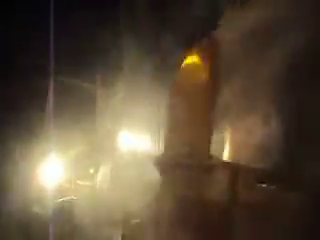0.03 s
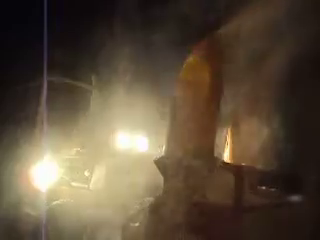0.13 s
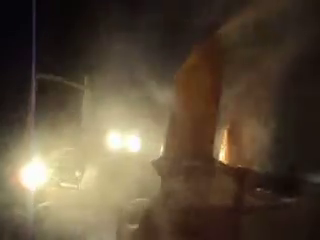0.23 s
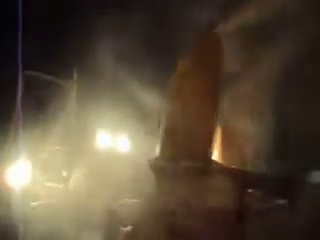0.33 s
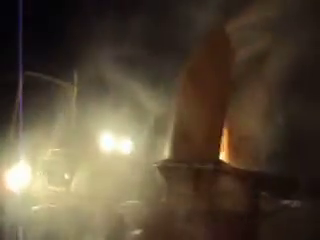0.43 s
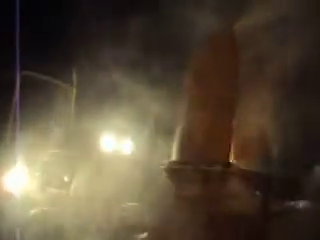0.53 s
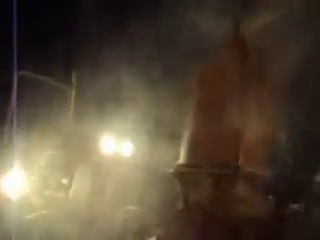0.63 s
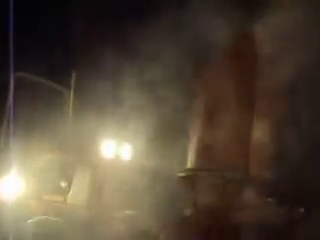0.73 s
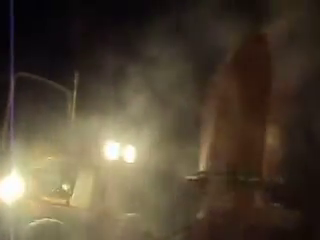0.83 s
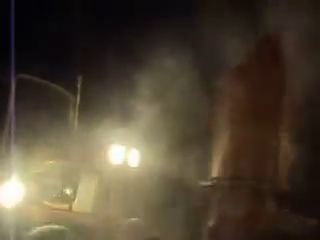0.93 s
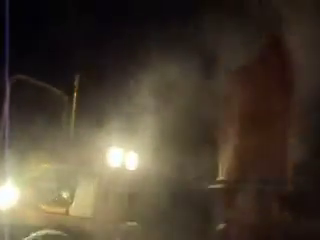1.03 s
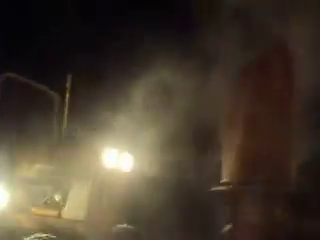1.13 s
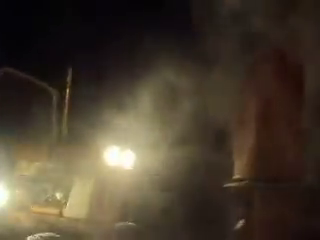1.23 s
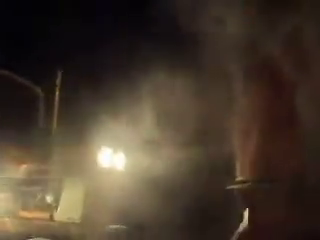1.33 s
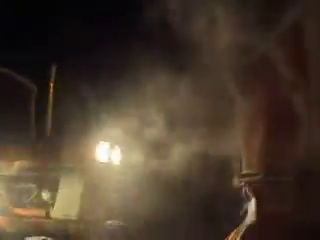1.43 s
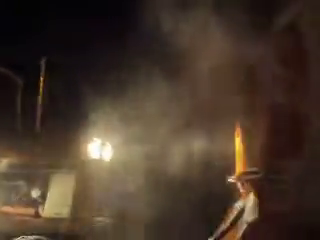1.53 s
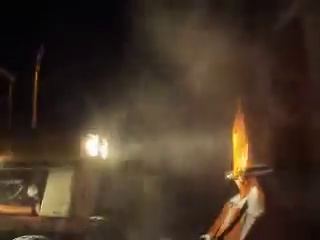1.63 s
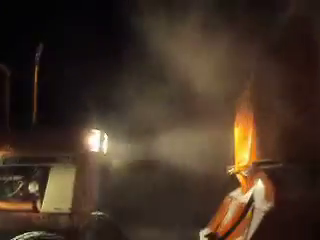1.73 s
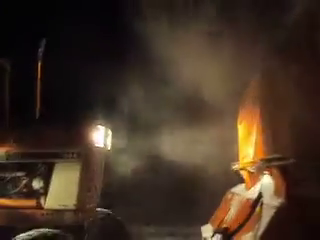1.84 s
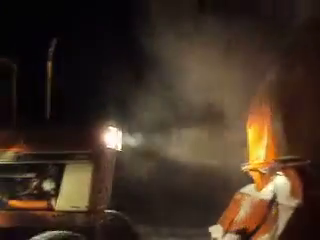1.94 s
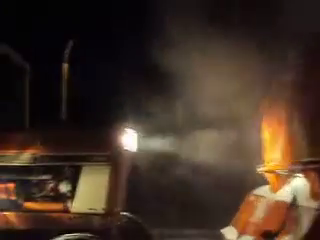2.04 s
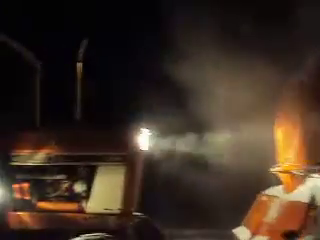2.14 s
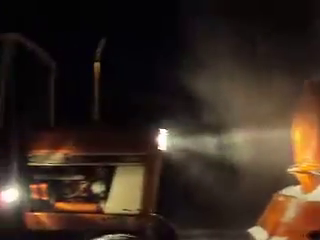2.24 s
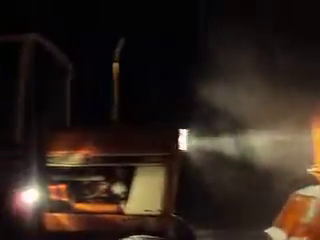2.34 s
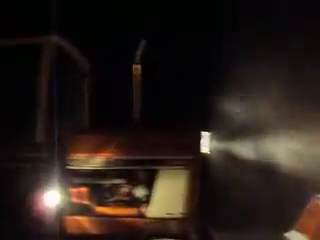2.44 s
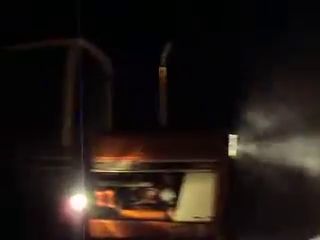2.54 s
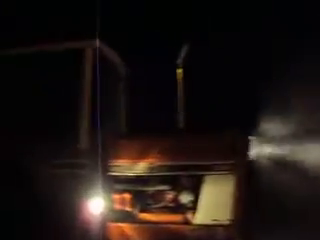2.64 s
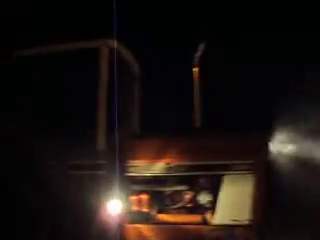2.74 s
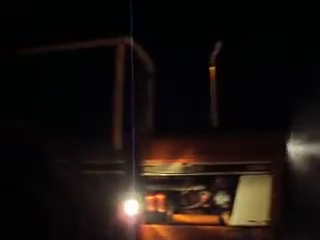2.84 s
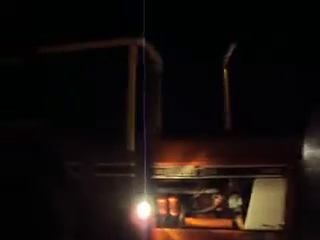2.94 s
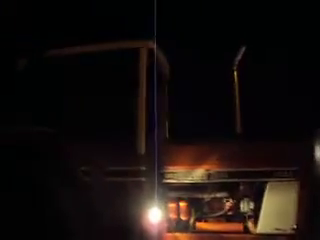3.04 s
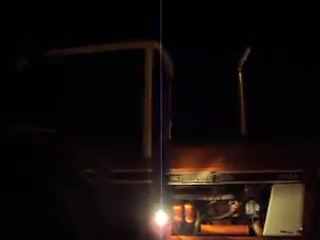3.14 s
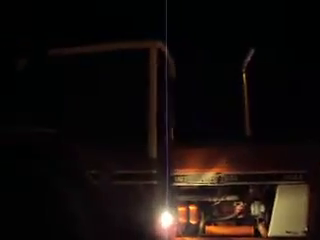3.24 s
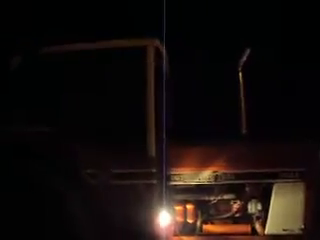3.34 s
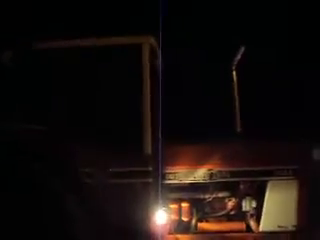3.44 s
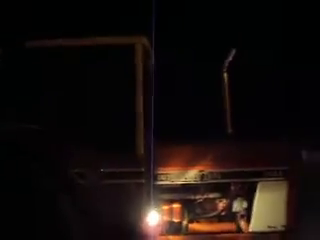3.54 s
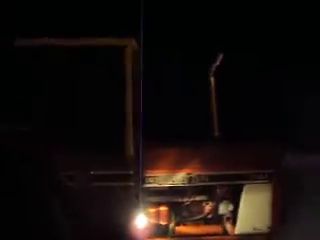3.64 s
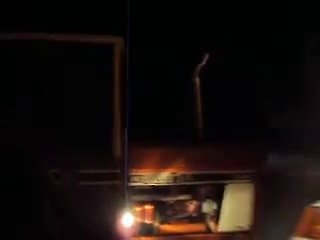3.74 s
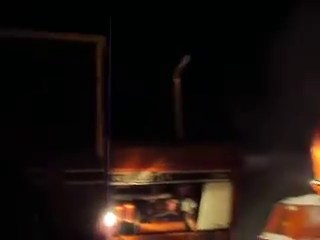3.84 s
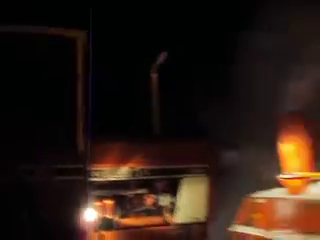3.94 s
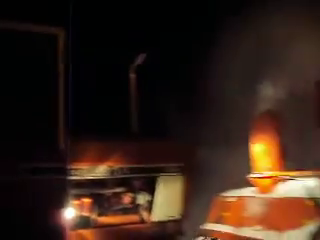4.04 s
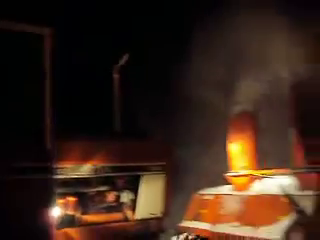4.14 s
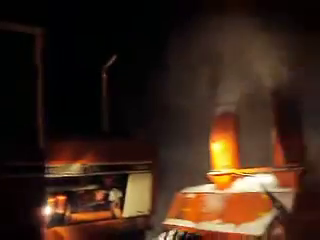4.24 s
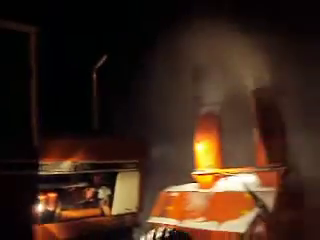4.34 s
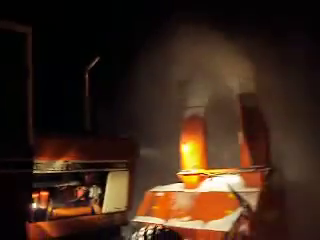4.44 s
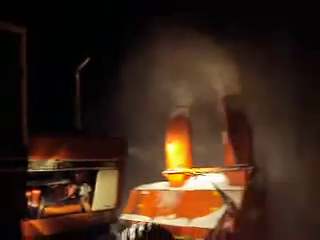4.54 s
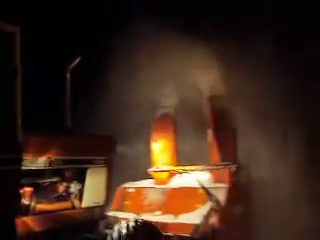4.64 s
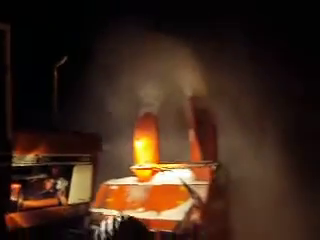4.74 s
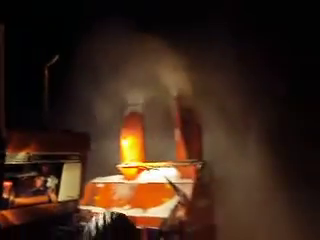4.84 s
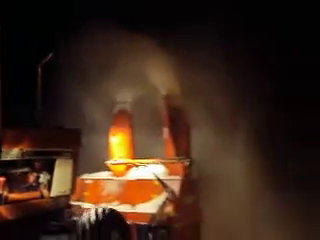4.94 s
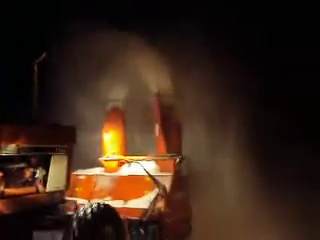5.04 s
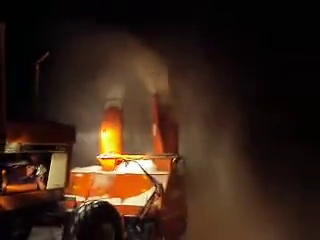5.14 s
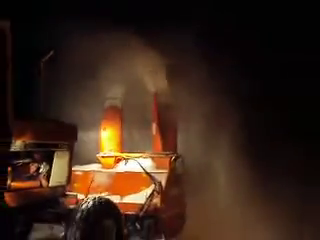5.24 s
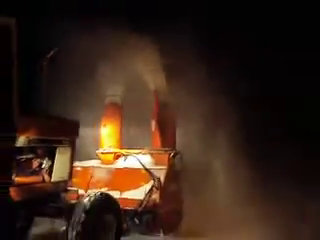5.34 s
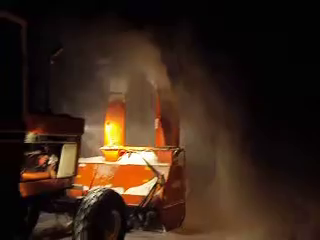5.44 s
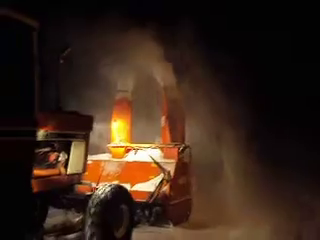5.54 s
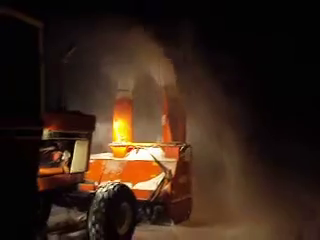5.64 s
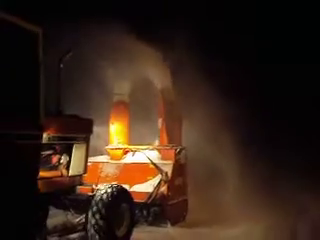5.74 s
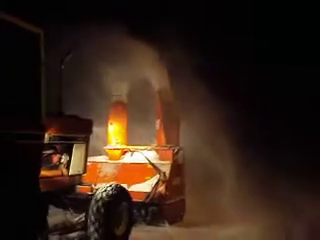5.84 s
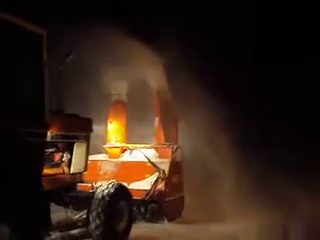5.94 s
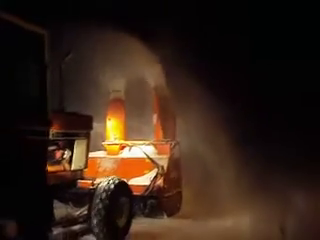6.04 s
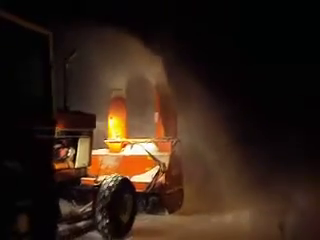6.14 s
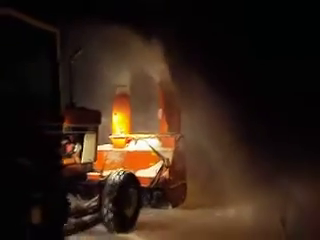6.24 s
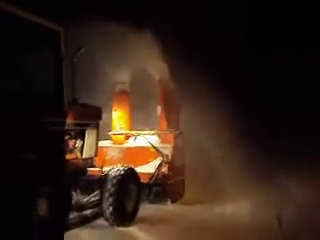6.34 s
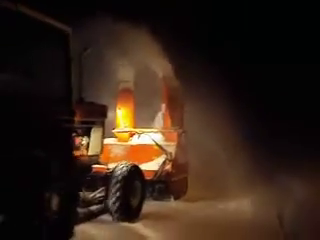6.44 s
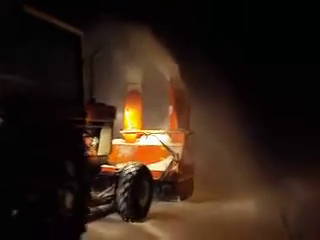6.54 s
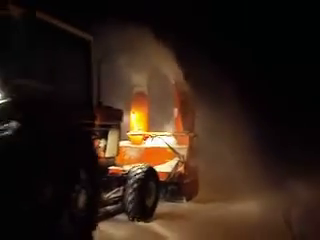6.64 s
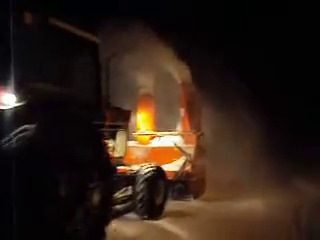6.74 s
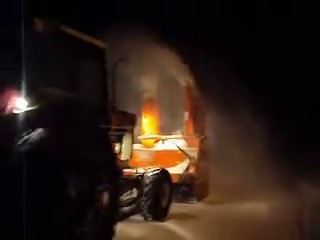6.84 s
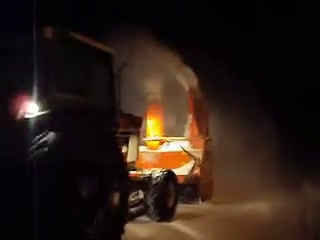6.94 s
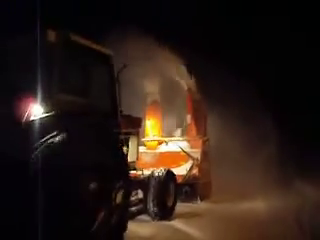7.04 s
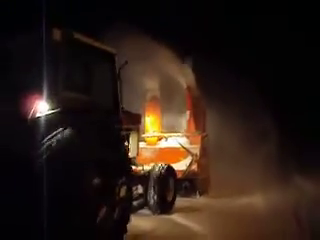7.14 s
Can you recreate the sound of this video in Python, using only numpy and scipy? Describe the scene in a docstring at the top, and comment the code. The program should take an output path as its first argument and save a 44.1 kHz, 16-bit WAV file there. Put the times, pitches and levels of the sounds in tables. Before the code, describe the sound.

A continuous heavy diesel drone with fast, uneven cylinder knocks and a churning snowblower, heard from a few metres in open air. The blower throbs briefly as it takes gulps of snow. Engine clatter and airy hiss rise as the engine bay passes, with metallic tones singing in turn, then roar and hiss subside as the machine moves on. Mono, limited treble, no echo.

```python
"""Tractor with snowblower passing

A six-cylinder diesel tractor creeps past, pushing a snowblower. Two sine tones drone as the exhaust;
noise modulated at each firing is coloured into block clatter, blower rumble and roar, and a hissing plume.
Blade tones throb with gulps of snow, a faint turbocharger whistles, engine orders sing and one tick clicks.
Engine and roar swell by the 1 / distance law; behind the cab, roar and clatter drop further.
Panel resonances ring out in turn, and two treble bands glide."""
import sys
import numpy as np
from scipy import signal
from scipy.fft import rfft, irfft, next_fast_len
from scipy.io import wavfile
from scipy.ndimage import map_coordinates

SR = 44100
rng = np.random.default_rng(int(sys.argv[2]) if len(sys.argv) > 2 else 0)


def master(y):
    """Save y as 16-bit WAV."""
    cut = np.clip(np.atleast_2d(y).T, -1, 1)
    pcm = np.round(cut * 32767)  # scale
    wavfile.write(sys.argv[1], SR, pcm.astype(np.int16))


N = 317079


def amp(db):
    """Decibel law: level to amplitude gain."""
    return 10 ** (np.asarray(db) / 20)


def unit(x):
    """Power normalisation: scale to rms 1."""
    return x / np.sqrt(np.mean(x ** 2) + 1e-20)


def bell(x, centre, width):
    """Gaussian hump of height 1."""
    return np.exp(-0.5 * ((x - centre) / width) ** 2)


def curves(rows, t=None):
    """Linear interpolation of each column after the time, per sample or at the times t."""
    times, *columns = np.transpose(rows)
    if t is None:
        t = np.arange(N) / SR
    return [np.interp(t, times, column) for column in columns]


def wobble(rate):
    """Band-limited fluctuation: a smooth random curve with rate knots a second."""
    coarse = np.arange(0, N + 128, 128)
    knots = rng.standard_normal(512)
    smooth = map_coordinates(knots, [coarse * rate / SR], mode="mirror")
    return np.interp(np.arange(N), coarse, smooth)


def filtered(x, response):
    """Linear filtering: multiply the spectrum by a response of frequency in Hz."""
    size = next_fast_len(N + 8192)
    return irfft(rfft(x, size) * response(np.fft.rfftfreq(size, 1 / SR)), size)[:N]


def coloured(x, spectrum):
    """Spectral shaping by frequency and level points, normalised to rms 1."""
    points_hz, points_db = np.transpose(spectrum)

    def response(hz):
        return amp(np.interp(np.log(hz + 1), np.log(points_hz), points_db))

    return unit(filtered(x, response))


# The engine sags under load and recovers: time_s, four_stroke_cycles_hz
SPEED = [(0.0, 15.28), (0.6, 15.21), (0.9, 15.11), (1.6, 15.02), (2.4, 15.01), (3.2, 15.09), (4.1, 15.25),
         (4.8, 15.25), (6.6, 14.94), (7.19, 14.98)]


def cycle_rate(t=None):
    """Engine speed under varying load, in four-stroke cycles per second."""
    return curves(SPEED, t)[0]


TRAVEL_M_PER_S = 1.0
# the cab comes between the listener and the working parts
CAB_S, CAB_FADE_S = 5.44, 0.27


def going_by(when, distance, near_db, cab_db):
    """Spherical spreading: level in dB falls as 1 / distance; the cab then takes off cab_db."""
    t = np.arange(N) / SR
    hidden = 0.5 + 0.5 * np.tanh((t - CAB_S) / (2 * CAB_FADE_S))
    spreading_db = 10 * np.log10(1 + (TRAVEL_M_PER_S * (t - when) / distance) ** 2)
    return near_db - spreading_db - cab_db * hidden


def tone(cycles, order, waver_db, waver_rate, drift):
    """Harmonic order of rotation: a sine of rms 1, unsteady in level and phase."""
    phase = 2 * np.pi * (order * cycles + rng.random()) + drift * wobble(7)
    return unit(amp(waver_db * wobble(waver_rate)) * np.sin(phase))


def drone(cycles, order, level_db):
    """Pure-tone radiation: one nearly steady exhaust order."""
    return amp(level_db) * tone(cycles, order, waver_db=1.2, waver_rate=8, drift=0.2)


# The lower exhaust tone swells and sinks: time_s, level_db
LOW_DRONE = [(0, -23.5), (.8, -44.5), (1.05, -28.5), (1.6, -32), (1.82, -25.5), (2.25, -24.5), (2.5, -28.5),
             (3.2, -28), (3.68, -23.5), (3.95, -28.5), (4.4, -25.5), (4.95, -36.5), (5.3, -27.5),
             (5.8, -26), (7.19, -29.5)]
# The upper exhaust tone goes by: closest_s, distance_m, closest_db, cab_loss_db (negative: a gain)
BOOM_PASS = (3, 0.97, -23, -3)
LOW_ORDER, BOOM_ORDER = 11, 12  # multiples of the cycle rate


def exhaust(cycles):
    """Periodic exhaust pulses: the pipe booms at two orders near twice the firing rate."""
    low = drone(cycles, LOW_ORDER, curves(LOW_DRONE)[0])
    boom = drone(cycles, BOOM_ORDER, going_by(*BOOM_PASS))
    return low + boom


def repeating(cycles, fade_rate=0.808, count=4, size=2048):
    """Cyclic repetition: patterns return every engine cycle while their mix slowly shifts."""
    spectra = np.exp(2j * np.pi * rng.random((count, size // 4)))  # flat, with random phases
    patterns = irfft(spectra, size)
    position = cycles % 1 * size
    played = np.array([map_coordinates(p, [position], order=1, mode="grid-wrap") for p in patterns])
    weights = np.array([wobble(fade_rate) for _ in patterns])
    weights = weights / np.linalg.norm(weights, axis=0)
    return unit(np.sum(played * weights, axis=0))


def fresh_noise():
    """Random excitation: low-passed Gaussian noise that never repeats."""
    return unit(filtered(rng.standard_normal(N), lambda hz: hz < 7700))


# Cylinders in firing order: relative_knock_strength (no unit)
CYLINDERS = [1.9, 0.65, 1.2, 1.4, 1.1, 0.63]


def knocking(cycles, locked, depth, decay):
    """Impulsive excitation: vibration leaps at each firing, then decays; the locked share of power repeats."""
    count = len(CYLINDERS)
    firing = cycles * count
    since = firing % 1  # in firing intervals, as is decay
    strength = np.take(CYLINDERS, firing.astype(int) % count)
    knock = strength * np.exp(-since / decay) * (1 - np.exp(-since / 0.11))
    vibration = np.sqrt(locked) * repeating(cycles) + np.sqrt(1 - locked) * fresh_noise()
    return vibration * (1 - depth + depth * unit(knock))


# The engine block goes by: closest_s, distance_m, closest_db, cab_loss_db
CLATTER_PASS = (3, 3, -20.5, 3)
# Colour of the block clatter: frequency_hz, relative_density_db
BLOCK = [(200, -44.5), (420, -6), (530, 2), (680, -0.5), (850, 0.5), (1100, -2.5), (1300, -4.5), (1550, -8),
         (1900, -11.5), (2600, -44.5), (5000, -65.5)]


def engine(cycles):
    """Structure-borne radiation: combustion knocks shake the block."""
    clatter = coloured(knocking(cycles, locked=0.52, depth=0.22, decay=0.61), BLOCK)
    return amp(going_by(*CLATTER_PASS)) * clatter


# Gulps of snow reach the impeller: centre_s, half_length_s, relative_peak_load_db
GULPS = [(0.093, 0.034, -16.5), (0.246, 0.038, -20.5), (0.628, 0.054, -25), (1.2, 0.023, -27.5),
         (1.535, .07, -16.5), (2.245, .2, -23.5), (2.914, 0.11, -18.5), (3.218, 0.052, -25),
         (3.757, 0.029, -20), (4.086, 0.076, -22.5), (4.88, 0.043, -22.5), (5.083, .04, -25.5),
         (5.315, 0.064, -24.5), (5.708, 0.026, -27), (5.91, 0.052, -29)]
IDLE_LOAD_DB = -38.5  # between gulps, on the same relative scale


def snow_load():
    """Load modulation: a steady feed plus the gulps sets how hard the impeller works."""
    t = np.arange(N) / SR
    gulps = sum(amp(db) * bell(t, s, span) for s, span, db in GULPS)
    return amp(IDLE_LOAD_DB) + gulps


# Colour of the auger's rumble: frequency_hz, relative_density_db
RUMBLE = [(12, -37), (30, -27), (45, -9.5), (58, -10), (78, 2.5), (92, -1), (110, -5.5), (150, -3),
          (220, -24.5), (500, -66)]
# Colour of the housing's roar: frequency_hz, relative_density_db
ROAR = [(90, -39.5), (140, 1.5), (185, -3.5), (240, -1), (300, -1), (380, -1.5), (460, -11), (600, -15),
        (1200, -59.5)]
# Auger rumble before the panels act: time_s, level_db
CHURN = [(0, -28), (1.05, -32), (1.9, -29), (3.35, -30), (4.3, -30), (4.85, -27.5), (5.5, -29.5),
         (6.2, -31), (7.19, -31)]
# The housing goes by: closest_s, distance_m, closest_db, cab_loss_db
ROAR_PASS = (2.5, 1.5, -20.5, 2.5)
GULP_ROAR_DB = -0.5  # change in the roar at the biggest gulp: slightly softer


def blower(cycles, load):
    """Cavity and structural excitation: churned snow makes a lumpy rumble and a hollow housing roar."""
    rumble = coloured(knocking(cycles, locked=0.12, depth=0.087, decay=0.5), RUMBLE)
    roar = coloured(knocking(cycles, locked=0.19, depth=0.14, decay=1.0), ROAR)
    roar_db = going_by(*ROAR_PASS) + GULP_ROAR_DB * load / load.max() + 1.1 * wobble(8.7)
    return amp(curves(CHURN)[0]) * rumble + amp(roar_db) * roar


# Colour of the hiss: frequency_hz, relative_density_db
HISS = [(700, -25.5), (1400, -0.5), (1900, -3), (2400, -0.5), (2800, -3.5), (3300, -5.5), (3700, -13.5),
        (4300, -18), (5000, -18.5), (5500, -29.5), (6100, -48)]
# Hissing plume before the panels act: time_s, level_db
PLUME = [(0, -35.7), (.8, -33.5), (1.75, -29.5), (2.6, -28), (3.3, -28.5), (4.3, -27.5), (4.9, -31.5),
         (5.6, -34), (6.4, -35), (7.19, -39)]


def spray(cycles):
    """Turbulent broadband noise: thrown snow hisses, mixed with the injectors' bright rattle."""
    bright = coloured(knocking(cycles, locked=0.31, depth=0.18, decay=0.4), HISS)
    return amp(curves(PLUME)[0] + 0.51 * wobble(12)) * bright


def impeller(cycles, load):
    """Blade-passing tone: the blades throb at 9.1 times the cycle rate, with their octave, under load."""
    blades = 9.1 * cycles
    throb = tone(blades, order=1, waver_db=0.5, waver_rate=10, drift=0.79)
    octave = tone(blades, order=2, waver_db=6.5, waver_rate=5.4, drift=0.3)
    return load * (amp(-4.0) * throb + amp(-16) * octave)


# Colour of the turbocharger whistle: frequency_hz, relative_density_db
WHISTLE = [(3500, -60.5), (3950, -17), (4120, 3), (4280, -13.5), (4800, -62)]
# The turbocharger goes by: closest_s, distance_m, closest_db, cab_loss_db (negative: a gain)
TURBO_PASS = (3.5, 0.6, -46.5, -3)


def turbo():
    """Narrow-band noise: a thin, airy, wavering whistle, loudest beside the open engine bay."""
    whistle = coloured(rng.standard_normal(N), WHISTLE)
    return amp(going_by(*TURBO_PASS) + 0.64 * wobble(6)) * whistle


# Weaker engine tones: multiple_of_cycle_rate, relative_level_db
ORDERS = [(6, -41), (10, -39), (16, -38), (18, -38), (22, -36), (26, -38), (43, -37), (44, -38), (45, -39),
          (46, -41), (49, -41), (51, -41), (54, -41), (57, -40), (58, -40), (60, -41), (61, -41), (62, -41),
          (63, -41), (64, -41), (65, -43), (66, -39), (69, -44), (70, -44), (78, -43)]
# A panel faces the listener and the nearest order sings:
# centre_s, half_length_s, frequency_hz, width_hz, lift_db, tone_db
FLARES = [(.45, 0.087, 309, 30.3, 6.5, -35), (1.501, 0.79, 276, 60.3, 2, -39.5),
          (1.7, 0.41, 934.6, 39.7, 7, -34.5), (2.094, 0.39, 1260, 70.5, 2.5, -31.5),
          (2.752, 0.41, 1045, 45, 6, -35), (3.054, .25, 777, 45.7, 3, -31.5),
          (3.547, 0.41, 1001, 30, -2.5, -33.5), (3.95, .3, 670, 30, 1.5, -37.5),
          (4.25, 0.61, 909, 45.2, 6, -36.5), (4.652, .5, 330, 25.2, 3.5, -31),
          (4.651, 0.27, 1172, 81, 4.5, -35), (5.705, .55, 749, 70, 1.5, -36),
          (7.05, .2, 626, 22.1, 0.5, -32)]
ORDERS_DB = -2  # added to all the weaker tones


def singing(cycles):
    """Resonant amplification: engine orders follow the clatter; a facing panel brings out its nearest one."""
    t = np.arange(N) / SR
    clatter_db = going_by(*CLATTER_PASS)
    nearness = amp(clatter_db - np.mean(clatter_db) + ORDERS_DB)
    gains = {order: amp(db) * nearness for order, db in ORDERS}
    for s, span, hz, _, _, db in FLARES:
        order = round(hz / float(cycle_rate(s)))
        gains[order] = gains.get(order, 0) + amp(db) * bell(t, s, span)
    return sum(gain * tone(cycles, order, waver_db=3.0, waver_rate=2.983, drift=0.21)
               for order, gain in gains.items())


# Panel resonances: frequency_hz, width_hz, lift_db
PANELS = [(260, 31, 0), (340, 20, -1.3), (470, 86, 2), (654, 41, 4.5), (770, 45, 1.6), (916, 71, -2.5),
          (1020, 74, 2.8), (1250, 67, 1.5)]
# A bright band in the hiss glides: time_s, frequency_hz, lift_db
SHEEN = [(0, 4500, 2.5), (1.7, 4870, 4), (2.2, 4500, 5.5), (2.6, 3870, 6), (3.9, 4290, 10),
         (4.9, 3530, 2.5), (7.19, 3190, 0)]
# The low middle hollows out alongside: centre_s, half_length_s, frequency_hz, width_hz, depth_db
HOLLOW = (2.6, 1.4, 512, 87, 5.5)
# the ground reflection lifts one band as the engine nears; its pitch sinks briefly in passing
MIRROR_DB, MIRROR_PEAK_S, MIRROR_RISE_S = 4, 3, 1.8
MIRROR_FAR_HZ, MIRROR_NEAR_HZ, MIRROR_DIP_S, MIRROR_SINK_S = 2424, 2010, 3.36, 0.68
CANCEL_DB, CANCEL_ABOVE_HZ = 4, 580  # the dip above that band while alongside


def passing(x):
    """Resonance and interference: panels turn to and from the listener, and two treble bands glide."""
    hz, t, z = signal.stft(x, SR, nperseg=2048)
    hz = hz[:, None]
    near = bell(t, MIRROR_DIP_S, MIRROR_SINK_S)
    mirror_hz = MIRROR_FAR_HZ + (MIRROR_NEAR_HZ - MIRROR_FAR_HZ) * near
    mirror_db = MIRROR_DB * bell(t, MIRROR_PEAK_S, MIRROR_RISE_S)
    lifted = mirror_db * bell(hz, mirror_hz, 170)
    # just above the lifted band the reflection cancels the direct sound
    cancelled = CANCEL_DB * near * bell(hz, mirror_hz + CANCEL_ABOVE_HZ, 200)
    sheen_hz, sheen_db = curves(SHEEN, t)
    sheen = sheen_db * bell(hz, sheen_hz, 150)
    panels = sum(db * bell(hz, centre, width) for centre, width, db in PANELS)
    flares = sum(db * bell(t, s, span) * bell(hz, centre, width)
                 for s, span, centre, width, db, _ in FLARES)
    s, span, centre, width, depth_db = HOLLOW
    hollow = depth_db * bell(t, s, span) * bell(hz, centre, width)
    gain_db = lifted - cancelled + sheen + panels + flares - hollow
    return signal.istft(z * amp(gain_db), SR, nperseg=2048)[1][:N]


# A sharp tick: start_s, peak_db (before its low-pass)
TICK = [(4.749, -11.5)]
TICK_TOP_HZ = 15900


def tick():
    """Exponential relaxation: a sudden step that decays with a 0.24 ms time constant."""
    y = np.zeros(N)
    t = np.arange(64) / SR
    for s, db in TICK:
        y[round(s * SR):][:len(t)] += amp(db) * np.exp(-t / 0.00024)
    return filtered(y, lambda hz: hz < TICK_TOP_HZ)


def scene():
    """Synchronous excitation: one crankshaft drives the knocks, orders and blades."""
    cycles = np.cumsum(cycle_rate()) / SR
    load = snow_load()
    machine = engine(cycles) + blower(cycles, load) + spray(cycles)
    tones = exhaust(cycles) + impeller(cycles, load) + turbo() + singing(cycles)
    return (passing(machine) + tones)[None]


TOP_HZ = 6100


def record(dry):
    """Band limitation: a sharp low-pass bounds the machine; the tick reaches above it."""
    return (filtered(dry[0], lambda hz: hz < TOP_HZ) + tick())[None]


dry = scene()
out = record(dry)
master(out)
```